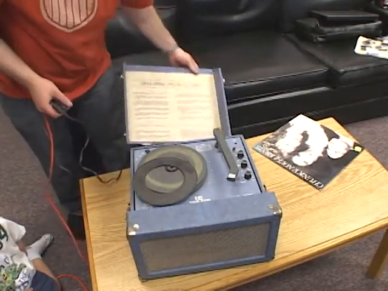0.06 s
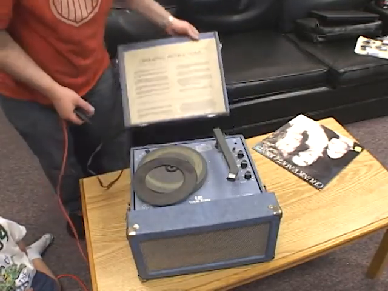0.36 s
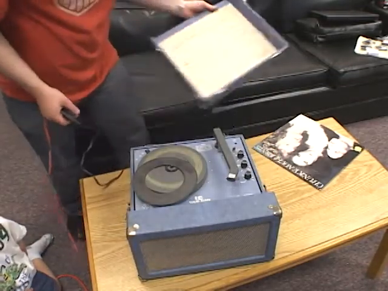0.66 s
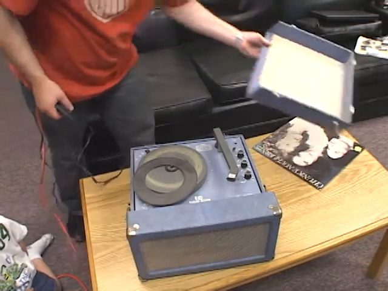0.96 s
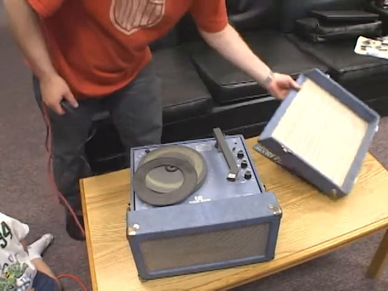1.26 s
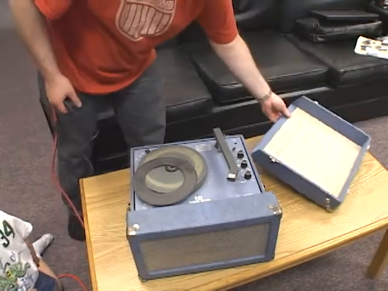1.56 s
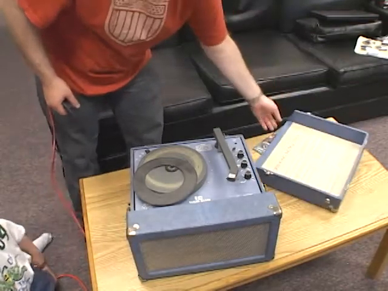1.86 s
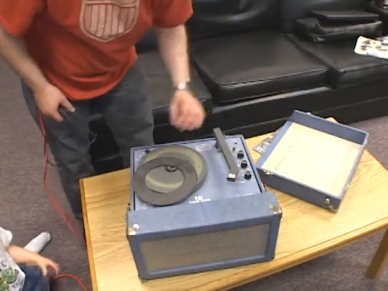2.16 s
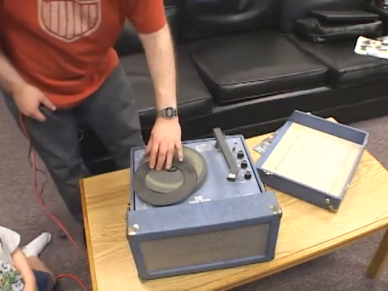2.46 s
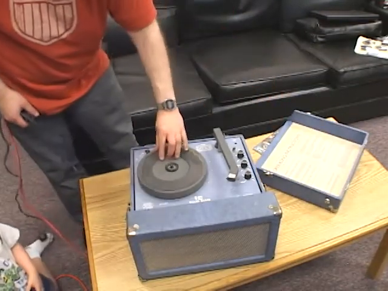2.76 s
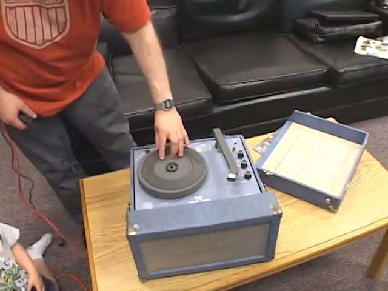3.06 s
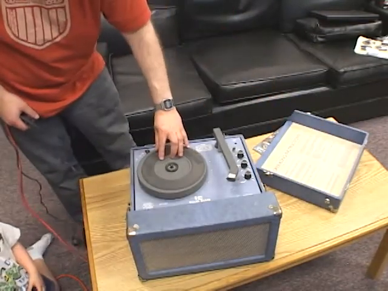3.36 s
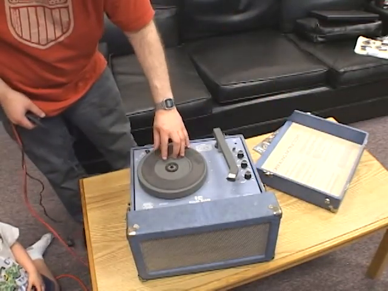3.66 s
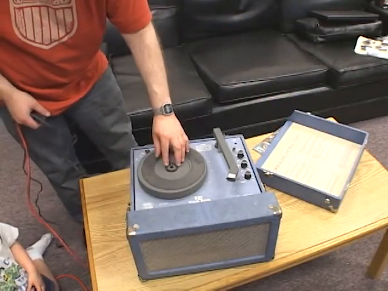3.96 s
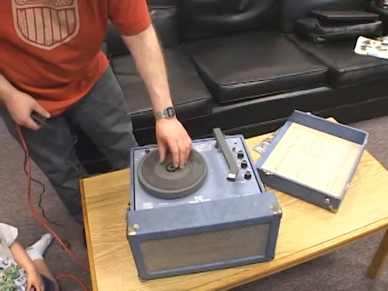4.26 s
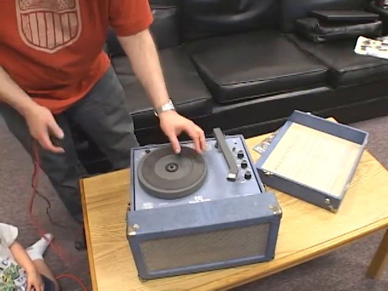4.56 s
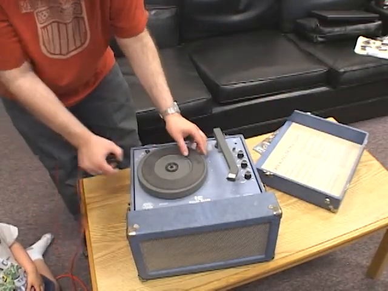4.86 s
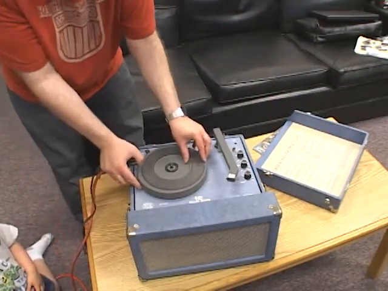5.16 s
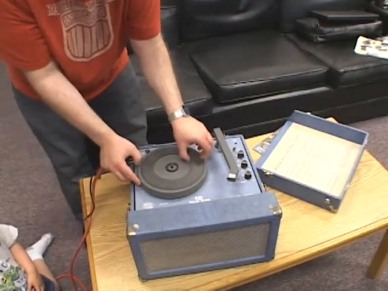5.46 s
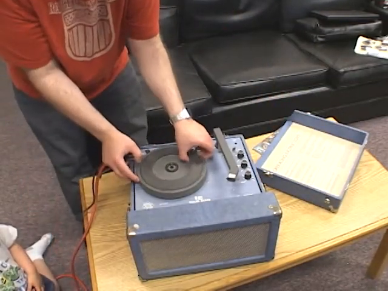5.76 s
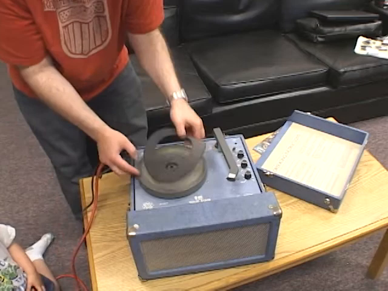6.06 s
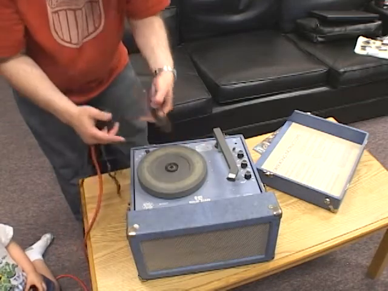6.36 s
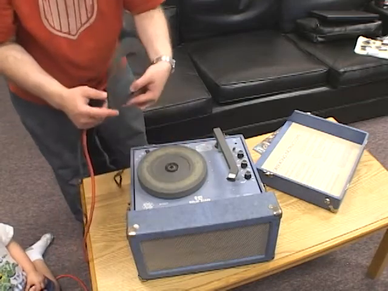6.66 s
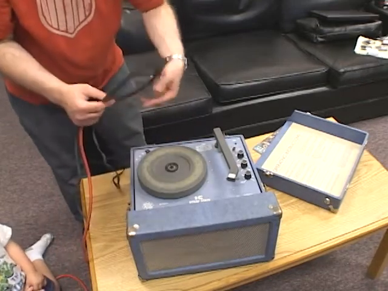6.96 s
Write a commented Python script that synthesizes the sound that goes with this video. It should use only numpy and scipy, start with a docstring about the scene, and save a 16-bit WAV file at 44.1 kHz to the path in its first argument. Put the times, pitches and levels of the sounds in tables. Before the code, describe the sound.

A sharp wooden knock and a small metal click open a portable record player. Its lid lands on a wooden table with several loud knocks and a final clatter. Much quieter handling follows: ringing taps and scrapes on the metal platter, scattered ticks, then the flick and rustle of a rubber mat coming off. Soft ventilation and a faint intermittent hum fill the small carpeted room, heard from a few steps away.

```python
"""A small carpeted room with quiet ventilation and a faint low hum that switches on and off.
Across the room from one microphone, the wooden lid of a portable record player is knocked free
of its case, set down on a wooden table and tips flat with a clatter; a loose catch clicks.
Fingers then tap and turn the metal platter, which rings and scrapes, and peel off its rubber mat,
which rubs between the hands. Blows ring the modes of wood and metal; friction is many tiny slips."""
import sys
import numpy as np
from scipy import signal
from scipy.fft import rfft, irfft, next_fast_len
from scipy.io import wavfile
from scipy.ndimage import uniform_filter1d

SR = 44100
rng = np.random.default_rng(int(sys.argv[2]) if len(sys.argv) > 2 else 0)


def log_audio(samples):
    """Write samples as a 16-bit WAV file to the path given in sys.argv[1]."""
    # one column per channel
    frames = np.atleast_2d(samples).T
    # limit to full scale, then quantise
    limited = np.clip(frames, -1, 1)
    pcm = np.round(limited * 32767).astype(np.int16)
    wavfile.write(sys.argv[1], SR, pcm)


N = 318402
TIME = np.arange(N) / SR
RING_TIME = TIME[:SR // 2]  # each struck sound gets half a second

# room tone from the ventilation: (frequency [Hz], relative level [dB])
VENT_SPECTRUM = [(25, -8), (60, -6.5), (135, -11), (195, 0.5), (400, -3), (560, 0.5), (1050, -4),
                 (1350, -9.5), (3200, -18), (5000, -19), (12000, -25.5)]
# when the hum runs: (on [s], off [s])
HUM_ON_OFF = [(0, .27), (1.16, 2.16), (2.76, 4.39), (4.93, 6.06), (6.85, 7.22)]
# partials of the hum: (harmonic number, level [dB])
HUM_PARTIALS = [(1, -64.5), (3, -73.5), (5, -89)]
# decay of the carpeted room: (frequency [Hz], t60 [s])
ROOM_DECAY = [(150, 0.49), (400, 0.25), (1000, 0.28), (4000, 0.24), (11000, 0.17)]

# hands and sleeves on the covering of lid and case: (time [s], swell [s], hold [s], level [dB])
BRUSH_STROKES = [(.5, 0.055, 0.17, -67.5), (.89, 0.012, 0.054, -60.5), (1.62, 0.063, .2, -50),
                 (5.11, 0.044, 0.13, -61), (5.28, 0.044, 0.023, -61), (5.67, .02, .05, -64.5),
                 (6.88, 0.044, .01, -62)]
# the lid sliding on the table, the mat rubbing in the hands: (time [s], swell [s], hold [s], level [dB])
RUB_STROKES = [(1.1, 0.15, 0.0083, -55), (4.96, .015, 0.067, -57), (5.045, 0.015, 0.034, -57),
               (6.1, 0.076, 0.1, -53.5), (6.35, 0.048, 0.11, -55), (6.535, .02, 0.11, -64)]
# a fingertip dragging over the mat: (time [s], swell [s], hold [s], level [dB])
DRAG_STROKES = [(4.59, 0.051, 0.042, -50.5), (4.69, 0.047, .12, -60.5)]
# the platter turned, fingered and losing its mat: (time [s], swell [s], hold [s], grit [dB], ring [dB])
SCRAPE_STROKES = [(2.548, .1, 0.085, -43, -55), (2.77, 0.0054, .09, -49.5, -46),
                  (5.129, 0.025, 0.0082, -66, -66), (5.2, 0.02, 0.011, -68, -69),
                  (5.89, 0.017, 0.093, -49, -59)]
# tone of each kind of friction: (frequency [Hz], relative level [dB])
BRUSH_SPECTRUM = [(150, -21.5), (300, -4.5), (950, 1), (1500, -8.5), (4700, -15), (6500, -20.5),
                  (8500, -27), (12000, -23)]
RUB_SPECTRUM = [(120, -33.5), (300, -10), (750, 3.5), (1400, -1), (2200, -2.5), (3500, -15), (5000, -22),
                (7000, -31), (12000, -38.5)]
DRAG_SPECTRUM = [(150, -27), (600, -15), (850, -7), (1120, 2), (1270, -5), (1380, -20), (1600, -13),
                 (1800, -20.5), (4000, -46)]  # peaks at the platter's lowest resonance
SCRAPE_SPECTRUM = [(300, -19), (700, -25), (1000, 4), (1400, -11.5), (2400, -2), (3300, 2.5), (4500, 4),
                   (5600, -4), (6600, -6.5), (8600, -19), (9600, -12), (11500, -21)]

# crack of wood and fittings, a blur of fast upper modes: (frequency [Hz], relative level [dB])
CRACK_SPECTRUM = [(100, -46), (300, -24), (600, -5), (1100, 1), (2400, 2.5), (3600, -2.5), (6200, -7),
                  (7500, -18), (8800, -23.5), (10500, -24), (11400, -20), (13000, -30.5)]
# crowded low modes of the table top and panels: (frequency [Hz], relative level [dB])
THUD_SPECTRUM = [(90, -41), (170, -12), (400, -2), (700, 0), (1050, -5), (1400, -17), (2200, -24),
                 (5000, -50)]
# modes of the metal catch, metal platter and wooden case: (frequency [Hz], t60 [s], relative peak [dB])
CATCH_MODES = [(940, 0.1, 1), (1026, 0.11, 3.5), (1140, 0.061, -1), (1250, 0.084, -4), (1460, 0.034, -10),
               (1760, 0.064, -5.5), (2200, 0.077, -11.5), (2710, 0.044, -12.5)]
PLATTER_MODES = [(1000, .12, -9), (1104, .13, -3), (2070, .1, -7), (2540, .07, -7), (3150, .18, -2),
                 (3720, .06, -4), (3980, .1, 3), (4180, .06, -4), (4630, .09, 2), (4800, .1, -3),
                 (5310, .12, -12), (5620, .08, -11), (6370, .11, -7), (7860, .08, -21), (9320, .05, -19),
                 (11330, .07, -11)]
CASE_MODES = [(202, 0.23, -7), (292.5, 0.28, 5), (476, .12, -9), (577, 0.17, -0.5), (763, 0.1, -2.5),
              (931, 0.2, 2.5), (1010.4, .16, 7), (1120, 0.22, -1.5), (1700, 0.11, -25), (2128, 0.062, -21)]
# the catch clicks as the lid lifts and as a hand grips the case: (time [s], ring [dB], tick [dB])
CATCH_FLAPS = [(0.277, -58.5, -66), (0.418, -40.5, -47.5), (4.938, -40, -60)]
# contacts, with levels relative to the tap. rim: platter edge struck; spindle: platter rocks;
# tick: small dry contact; snap: mat flicks off the spindle; press: platter pushed against the case;
# deck: a short dull knock, from a finger on the deck or the rubber mat flapping in the hands;
# soft: rubber or a fingertip bumps.
# touch: (metal ring [dB], crack [dB], crack t60 [s], tilt [dB/octave], case knock [dB])
TOUCH_KINDS = {"rim": (-4.5, -2.5, 0.06, 5.5, -11.5), "spindle": (-3, -3.5, 0.06, -1, -19),
               "tick": (-4.5, -5, 0.03, -.5, -22), "snap": (-10, -4, 0.18, 2.5, -23),
               "press": (-6.5, -5.5, 0.5, 5, -1), "deck": (-23, -1, .028, -5, -8),
               "soft": (-17, -1, 0.3, -8.5, -1)}
# taps of fingers, platter and mat: (time [s], touch, level [dB])
PLATTER_TAPS = [(2.489, "rim", -37), (2.716, "rim", -39), (2.778, "rim", -35), (2.809, "tick", -44.5),
                (2.831, "tick", -47), (4.030, "deck", -58), (4.202, "tick", -62.5), (4.2451, "tick", -53),
                (4.2796, "spindle", -44), (4.297, "spindle", -44), (4.397, "tick", -56),
                (4.934, "deck", -36.5), (5.0224, "tick", -57.5), (5.0653, "deck", -53),
                (5.318, "soft", -51.5), (5.4434, "soft", -54), (5.511, "press", -50.5),
                (5.523, "tick", -54), (5.660, "press", -47.5), (6.0135, "snap", -43),
                (6.4007, "deck", -57.5), (6.457, "soft", -51), (6.631, "deck", -55.5),
                (7.073, "deck", -51.5)]
# single notes of the platter, a squeak as it turns and a thin ring as the mat flicks off:
# (time [s], frequency [Hz], rise [s], t60 [s], level [dB])
PLATTER_NOTES = [(2.68, 938, 0.014, 0.12, -41.5), (2.679, 3145, 0.042, 0.2, -46.5),
                 (6.013, 2986, .003, 1, -57.5)]
# modes of the wooden lid, with a relative peak for each spot struck:
# (frequency [Hz], t60 [s], hinge [dB], corner [dB], edge [dB], face [dB])
LID_MODES = [(189.8, 0.27, 19.5, 32, 31.7, 10), (265, 0.08, 16, 15, 18, 28), (321, 0.22, 15, 36, 33, 35),
             (413, 0.08, 34.5, 21, 25, 32), (452, 0.14, 30.5, 22, 27, 24), (525, 0.089, 23, 12, 19, 27),
             (587.6, 0.16, 27, 35, 30, 38), (683, 0.083, 26, 37, 12, 44), (721, 0.058, 29, 31, 27, 42),
             (855, 0.18, 27, 41, 31.9, 35), (927, 0.04, 27.5, 34, 25.7, 25),
             (1002.6, .06, 34.5, 40, 30, 25), (1093, 0.037, 24, 21, 11.3, 18),
             (1236, 0.022, 21.5, 23, 17.6, 17), (1393, 0.07, 19.5, 23, 15, 28),
             (1504, 0.056, 15, 13, 5.6, 25), (1730, .05, 6, 14, 18, 28)]
# names of those spots, in column order
LID_SPOTS = ["hinge", "corner", "edge", "face"]
# blows on the lid: (time [s], spot, level [dB], hardness as treble tilt [dB/octave])
LID_BLOWS = [(0.0232, "hinge", -14.5, -2.5), (0.058, "hinge", -30.5, -0.4), (0.074, "hinge", -30.5, 0),
             (0.103, "hinge", -39.5, 0.5), (0.895, "hinge", -53.5, 4), (1.288, "corner", -8.5, -0.7),
             (1.305, "corner", -23, -9), (1.328, "edge", -23, -6.5), (1.3824, "edge", -22, -2.8),
             (1.452, "edge", -34, 3), (1.4987, "edge", -18, 3.5), (1.5648, "edge", -21, 2),
             (1.869, "face", -39, -2.5), (1.8855, "face", -9.5, -1.35), (1.9314, "face", -18.5, -2),
             (1.942, "face", -25.5, 1.5), (1.972, "face", -27, 0), (2.122, "face", -36.5, -24)]


def undb(db):
    """Decibels to gain."""
    return 10 ** (np.asarray(db) / 20)


def unit(x):
    """Scale to rms 1."""
    return x / np.sqrt(np.mean(x ** 2))


def at_level(x, db):
    """Scale a short sound so that its energy, spread over 10 ms, has this level."""
    return x * undb(db) * np.sqrt((SR // 100) / np.sum(x ** 2))


def add(track, start_s, x):
    """Mix x into the track at the given time."""
    start = max(int(start_s * SR), 0)
    track[start:start + len(x)] += x[:N - start]


def along(points, hz):
    """Read (frequency [Hz], value) points on a log-frequency axis."""
    point_hz, value = np.transpose(points)
    return np.interp(np.log(np.maximum(hz, 1)), np.log(point_hz), value)


def colour(x, spectrum, tilt=0):
    """Causal filter with the given spectrum, tilted in dB per octave."""
    size = next_fast_len(len(x) + 4096) * 2
    hz = np.arange(size // 2 + 1) * SR / size
    db = along(spectrum, hz) + tilt * np.log2(np.maximum(hz, 100))
    cepstrum = irfft(db * np.log(10) / 20)
    cepstrum[1:size // 2] *= 2  # minimum phase: nothing sounds ahead of an attack
    cepstrum[size // 2 + 1:] = 0
    return irfft(rfft(x, size) * np.exp(rfft(cepstrum)))[:len(x)]


def fade(t60):
    """Exponential decay, 60 dB down after t60 seconds."""
    return np.exp(-np.log(1000) * RING_TIME / max(t60, 1e-3))


def ventilation(level_db=-64.5):
    """Room tone: a steady, dull rush of air."""
    return undb(level_db) * unit(colour(rng.standard_normal(N), VENT_SPECTRUM))


def hum(fundamental_hz=30):
    """A faint low hum of odd harmonics that comes and goes."""
    running = sum(1. * ((TIME > on) & (TIME < off)) for on, off in HUM_ON_OFF)
    gate = uniform_filter1d(running, size=900)  # 20 ms ramps
    tone = sum(undb(db) * unit(np.sin(2 * np.pi * k * fundamental_hz * TIME)) for k, db in HUM_PARTIALS)
    return gate * tone


def room(x, wet_db, delay_s):
    """Diffuse echoes reach the microphone after the direct sound; the treble dies first."""
    size = len(RING_TIME)
    noise = rfft(rng.standard_normal(size))
    hz = np.arange(len(noise)) * SR / size
    octave = np.log2(np.clip(hz, 125, 16000) / 125)
    tail = 0
    for k in range(8):
        band = irfft(noise * np.maximum(1 - abs(octave - k), 0), size)
        tail = tail + band * fade(along(ROOM_DECAY, 125 * 2 ** k))
    tail *= np.clip(RING_TIME / delay_s - .5, 0, 1)
    tail /= np.sqrt(np.sum(tail ** 2))
    return x + undb(wet_db) * signal.fftconvolve(x, tail)[:N]


def ring(modes, column=0, tilt=0, scatter_db=0):
    """Struck modes; neighbours swing in opposite senses, and each blow detunes them slightly."""
    out = 0
    for k, (hz, t60, *peaks_db) in enumerate(modes):
        detune, scatter = rng.standard_normal(2)
        swing = np.sin(2 * np.pi * hz * (1 + .004 * detune) * RING_TIME)
        peak_db = peaks_db[column] + tilt * np.log2(hz) + scatter_db * scatter
        amplitude = undb(peak_db) / t60  # a shorter ring starts louder for the same spectral peak
        out = out + (-1) ** k * amplitude * fade(t60) * swing
    return out


def crack(tilt, snap_t60, tail_t60, tail_db, rise_s):
    """The snap of contact and the short blur of upper modes after it."""
    decay = fade(snap_t60) + undb(tail_db) * fade(tail_t60)
    attack = np.minimum(RING_TIME / rise_s, 1)
    return colour(rng.standard_normal(len(RING_TIME)) * decay * attack, CRACK_SPECTRUM, tilt)


def thud(t60):
    """Low modes of table top and panels, too crowded to tell apart."""
    return colour(rng.standard_normal(len(RING_TIME)) * fade(t60), THUD_SPECTRUM)


def slips(per_s, spread_db):
    """Sliding surfaces make a stream of tiny slips of uneven size."""
    slipping = rng.random(N) < per_s / SR
    return slipping * rng.standard_normal(N) * undb(spread_db * rng.standard_normal(N))


def pressure(strokes, sag_db_per_s, release_t60):
    """Gain over time of strokes that swell, sag while held and die away."""
    out = 0
    for start, swell, hold, db in strokes:
        held = np.maximum(TIME - start - swell, 0)
        released = np.maximum(held - hold, 0)
        rise = np.clip((TIME - start) / swell, 0, 1) ** 2
        release = np.exp(-np.log(1000) * released / release_t60)
        out = out + rise * undb(db - sag_db_per_s * held) * release
    return out


def friction():
    """Scraping sets the platter singing; rubber, cloth and the sliding lid only rustle."""
    grit = slips(per_s=5500, spread_db=1)
    singing = unit(signal.fftconvolve(grit, ring(PLATTER_MODES))[:N])
    scrape = unit(colour(grit, SCRAPE_SPECTRUM))
    rub = unit(colour(slips(per_s=9500, spread_db=0), RUB_SPECTRUM))
    brush = unit(colour(slips(per_s=7000, spread_db=0.5), BRUSH_SPECTRUM))
    drag = unit(colour(slips(per_s=3000, spread_db=0.3), DRAG_SPECTRUM))
    grit_strokes = [(*timing, grit_db) for *timing, grit_db, _ in SCRAPE_STROKES]
    ring_strokes = [(*timing, ring_db) for *timing, _, ring_db in SCRAPE_STROKES]
    return (scrape * pressure(grit_strokes, sag_db_per_s=68, release_t60=0.11)
            + singing * pressure(ring_strokes, sag_db_per_s=73, release_t60=0.13)
            + rub * pressure(RUB_STROKES, sag_db_per_s=25, release_t60=0.15)
            + brush * pressure(BRUSH_STROKES, sag_db_per_s=15, release_t60=0.17)
            + drag * pressure(DRAG_STROKES, sag_db_per_s=40, release_t60=0.13))


def catch():
    """The loose catch flaps against its plate: a short ring and a tick."""
    out = np.zeros(N)
    for start, ring_db, tick_db in CATCH_FLAPS:
        add(out, start, at_level(ring(CATCH_MODES), ring_db))
        tick = crack(tilt=-3.5, snap_t60=0.0039, tail_t60=0.046, tail_db=-33, rise_s=0.0003)
        add(out, start, at_level(tick, tick_db))
    return out


def platter():
    """Taps ring the mat-damped platter and knock the wooden case; single notes squeak or ring on."""
    out = np.zeros(N)
    for start, touch, db in PLATTER_TAPS:
        ring_db, crack_db, snap_t60, tilt, case_db = TOUCH_KINDS[touch]
        metal = ring(PLATTER_MODES, tilt=tilt - 1.2, scatter_db=3)
        contact = crack(tilt, snap_t60, tail_t60=1.7 * snap_t60, tail_db=-17, rise_s=0.00065)
        case = ring(CASE_MODES, scatter_db=4.5)
        add(out, start, at_level(metal, db + ring_db))
        add(out, start, at_level(contact, db + crack_db))
        add(out, start, at_level(case, db + case_db))
    for start, hz, rise, t60, db in PLATTER_NOTES:
        swell = np.minimum(RING_TIME / rise, 1) ** 2
        note = swell * fade(t60) * np.sin(2 * np.pi * hz * RING_TIME)
        add(out, start, at_level(note, db))
    return out


def lid(ring_above_db=-22.5, radiation_hz=134):
    """Each blow rings the wooden shell according to the spot struck, and thumps what it lands on."""
    out = np.zeros(N)
    for start, spot, db, tilt in LID_BLOWS:
        shell = ring(LID_MODES, column=LID_SPOTS.index(spot))
        shell_db = 0.51 * (db - ring_above_db)  # light blows mostly thump, heavy ones ring
        body = at_level(shell, shell_db) + at_level(thud(t60=0.18), 0)
        contact = crack(tilt, snap_t60=0.02, tail_t60=0.12, tail_db=-12.5, rise_s=0.001)
        crack_db = db - 9 + 1.2 * tilt  # a harder contact is louder as well as brighter
        add(out, start, at_level(body, db))
        add(out, start, at_level(contact, crack_db))
    # small panels hardly radiate bass
    bass_cut = signal.butter(3, radiation_hz, "high", fs=SR, output="sos")
    return signal.sosfilt(bass_cut, out)


def scene():
    """All the handling over the room tone, in mono from across the room."""
    clatter = room(lid() + catch(), wet_db=-9.5, delay_s=0.0048)
    handling = room(platter() + friction(), wet_db=-11, delay_s=0.0067)
    return (clatter + handling + ventilation() + hum())[None]


def record(dry, ceiling=0.9, top_hz=11900):
    """A soft limiter rounds the loudest knock, and a filter cuts the top of the treble."""
    rounded = dry / (1 + (dry / ceiling) ** 8) ** (1 / 8)
    treble_cut = signal.ellip(8, .2, 70, top_hz, fs=SR, output="sos")
    return signal.sosfilt(treble_cut, rounded)


dry = scene()
out = record(dry)
log_audio(out)
```